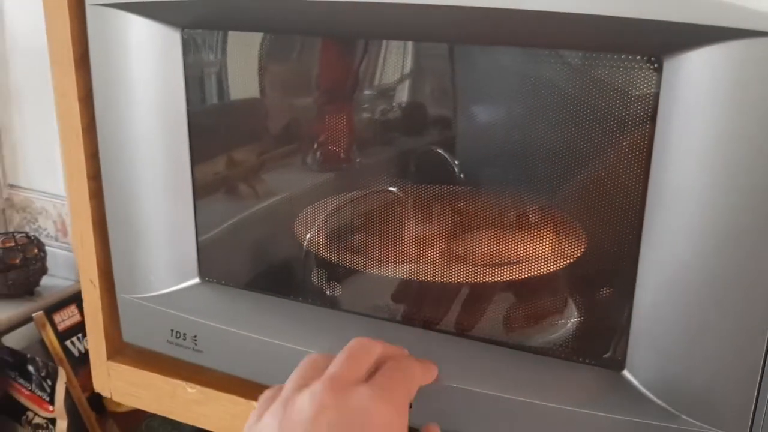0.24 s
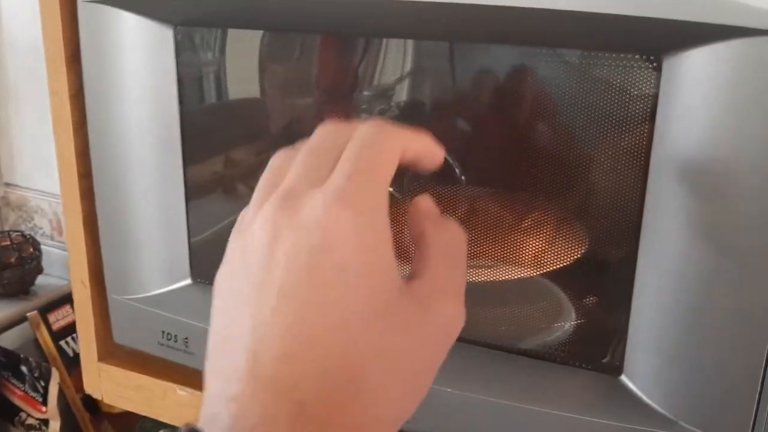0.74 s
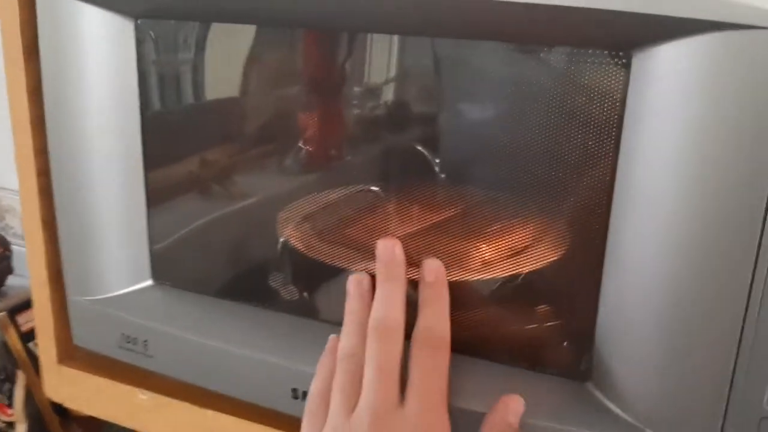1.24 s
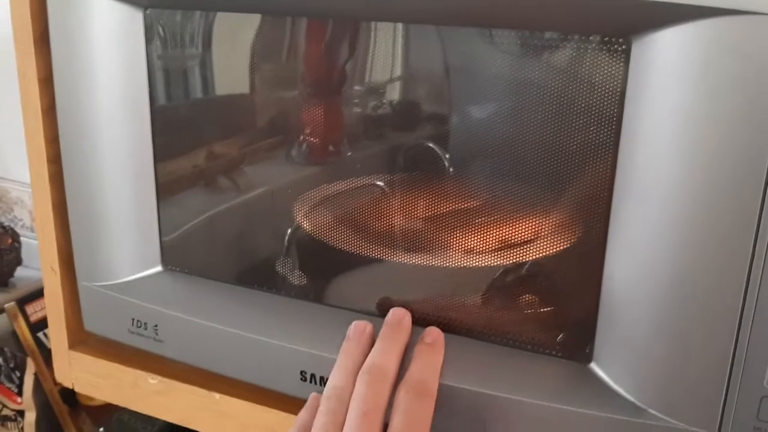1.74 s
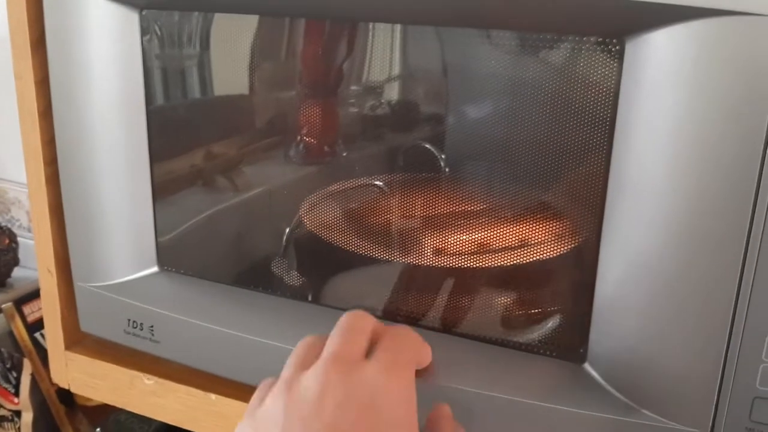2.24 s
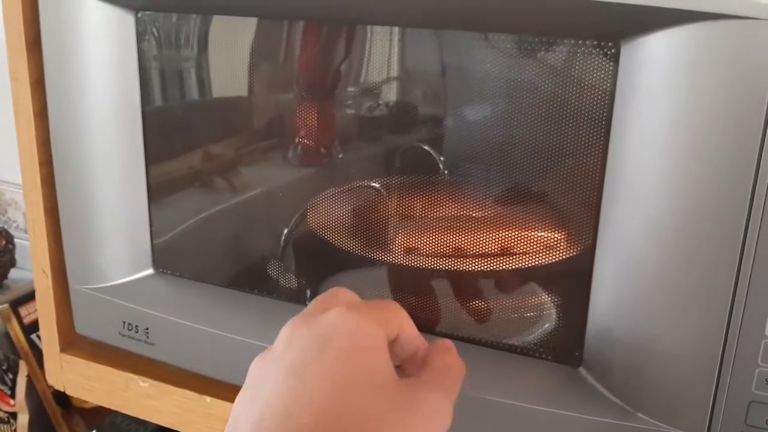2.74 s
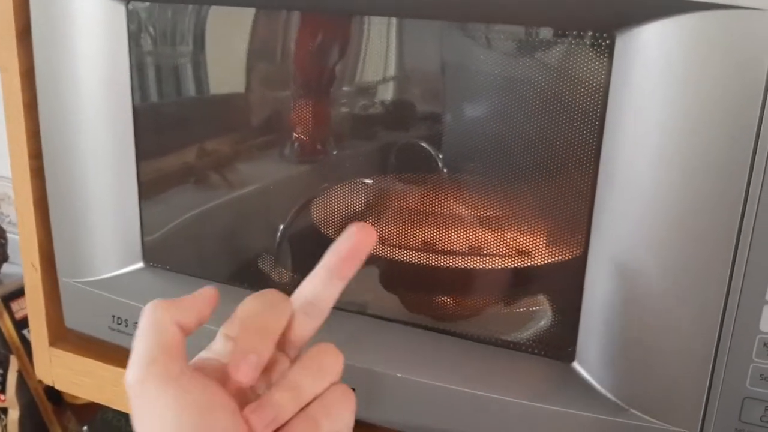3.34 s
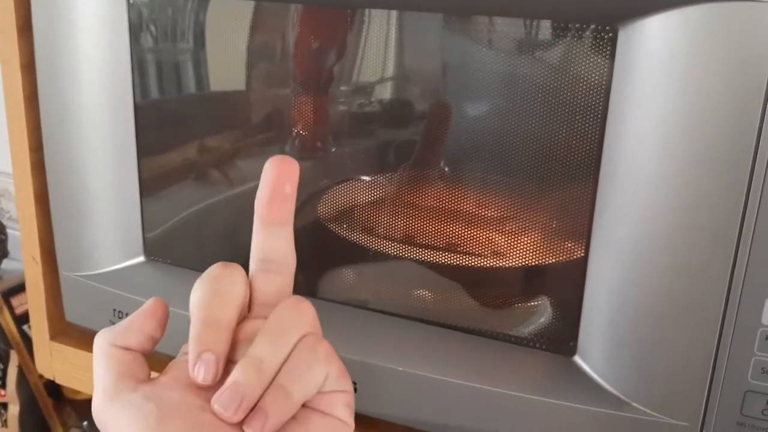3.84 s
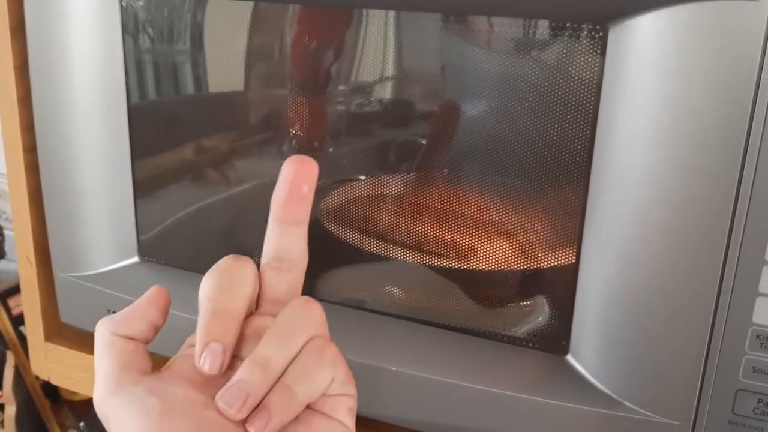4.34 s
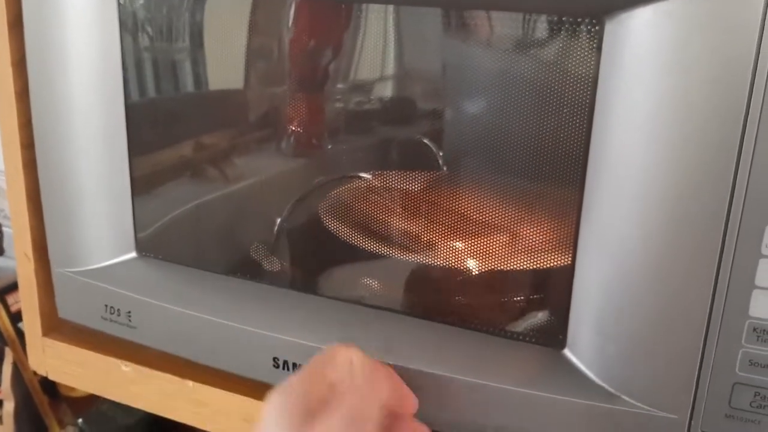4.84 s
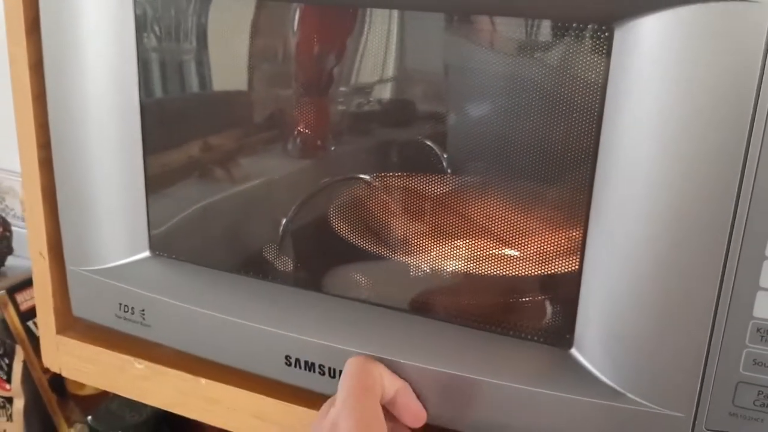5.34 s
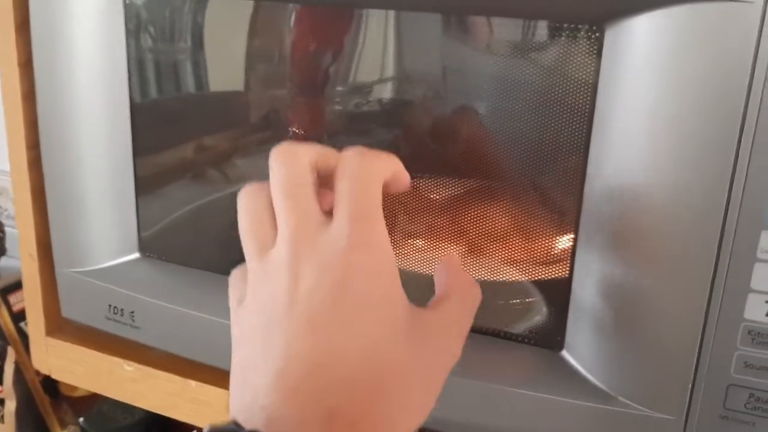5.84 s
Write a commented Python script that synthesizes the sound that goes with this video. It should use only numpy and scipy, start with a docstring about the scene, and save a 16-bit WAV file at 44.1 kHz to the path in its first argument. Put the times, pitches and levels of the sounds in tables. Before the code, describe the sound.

Just in front of a running microwave oven in a kitchen, a low electrical hum with fine buzz, droning fan and soft air rush continue throughout. About one second in, a palm slaps the door: a hollow thud with a brief latch rattle. Fingers then slide faintly over the glass. Later come tiny, very high steam squeals and one small pop from the food. Close stereo microphone, short room ring.

```python
"""The transformer of a running microwave oven hums and buzzes, heard just in front of the door: mains sines.
A hand slaps the door, which rings and rattles in its latch: pushed resonances and short noise bursts.
Fingers slide over the glass as soft hiss; the food squeals thinly as gliding sines and pops once.
Behind this the fan drones as unsteady sines, and cooling air rushes through the case as shaped noise."""
import sys
import numpy as np
from scipy import signal
from scipy.fft import rfft, irfft
from scipy.io import wavfile

SR = 44100
rng = np.random.default_rng(int(sys.argv[2]) if len(sys.argv) > 2 else 0)


def generate_wav(sig):
    """Save sig (samples, or channels by samples) to the path in sys.argv[1] as 16-bit PCM at SR."""
    pcm = np.round(np.clip(np.atleast_2d(sig).T, -1, 1) * 32767).astype(np.int16)
    wavfile.write(sys.argv[1], SR, pcm)


N = 269010
TIME = np.arange(N) / SR   # seconds
BINS = np.maximum(np.fft.rfftfreq(N, 1 / SR), 1)   # Hz, kept above zero for the logarithm

MAINS_HZ, BLADE_HZ = 49.965, 152.64
# strong mains harmonics of the transformer and case (multiples are rounded to whole numbers):
# multiple, level_db, left_minus_right_db, left_lead_rad
HUM_HARMONICS = [(1, -72.5, 8, -1), (2, -54, -6, 0.28), (3, -80, 6, 0.5), (5, -63.5, 0, -1.5),
                 (6, -63.5, 9, -1.3), (8, -56.5, 3, -1.44), (14, -65, -1, -1.5), (16, -67, -6, -0.5),
                 (17, -64.5, 4, -0.3), (18, -62.5, 1, -1.5), (20, -64, -6, 1.3), (22, -64.5, -24, -0.6),
                 (24, -64.5, -19, 4), (26, -67, 15, 1), (30, -64, -0.5, -3), (36, -63, 3, 0.84),
                 (47, -66, -12, -3), (50, -70, -21, -1), (63.96, -65.6, -9, 2), (70.9, -73.5, 0, 1),
                 (73.9, -75.5, 3, 1), (79.2, -74, 0, 1.5), (86.6, -74, -4, 2), (104, -76, 8, 2.2),
                 (116, -79, 5, 1.5), (126, -76, 13, 2.5), (140, -80.5, 3, 0.5), (146, -84, 0, 2.5),
                 (153, -83, 2, 2), (163, -78.5, 4, 1)]
# fine buzz, the usual level of each other mains harmonic: pitch_hz, level_db
BUZZ_LEVELS = [(350, -74), (700, -65), (1250, -68.5), (2250, -86.5), (2750, -103), (3700, -79), (4300, -83),
               (4750, -86), (6000, -102.5), (7500, -79.5), (8250, -102), (8900, -101)]
# the hum starts dull: harmonics above a corner lack some dB per octave, a lack that dies away
DULL_ABOVE_HZ, DULL_DB_PER_OCTAVE, BRIGHTEN_S = 770, 3.5, 1.6
# the door drones on one harmonic, which slowly swells and fades; the hand damps it while it rests there
DRONE_MULTIPLE, DRONE_PEAK_DB, DRONE_PEAK_S, DRONE_SLOPE_DB_PER_S = 4, -48.5, 1.9, 1.74
HAND_ON_S, HAND_OFF_S, HAND_EASE_S, HAND_DAMPS_DB = 1.05, 1.87, 0.06, 7
WHINE_MULTIPLE = 82
# thin whine on that high harmonic, before its trim: time_s, level_db
WHINE_LEVELS = [(0, -72), (0.45, -71.7), (0.85, -62), (2.0, -67), (2.9, -64), (4.4, -70.5), (5.6, -65),
                (6.1, -66)]

# pushes of the palm on the door, which swings in and back: start_s, thud_db, contact_s, smack_db
SLAP_PUSHES = [(.9745, -20, .002, -6), (.9787, -4, .0046, 0), (.9844, -17, .0015, -13),
               (1.0024, -10, .0082, -9)]
# resonances of door and case, before trim and ear differences: pitch_hz, level_db, fall_by_60_db_s
DOOR_MODES = [(86, -25, .35), (142, -4.6, .17), (158, -6.6, .15), (188, -9, .19), (261, 3, .03),
              (323, -8, .28), (377, -14, .11), (455, -9, .13), (604, -12, .15), (644, -4, .08),
              (703, 3.5, .04), (815, -4, .16), (906, -5, .15), (1115, -5, .09), (1394, -12, .08)]
# colour of the palm's smack: pitch_hz, density_db_per_hz
SMACK_COLOUR = [(30, -115), (300, -76), (1000, -59.5), (2200, -68), (3300, -77), (4200, -60.5), (5000, -71),
                (5800, -70), (6500, -69), (7500, -65), (8800, -82), (16000, -81)]
# colour of the latch's clatter: pitch_hz, density_db_per_hz
LATCH_COLOUR = [(30, -115), (300, -65), (1000, -55), (1400, -59.5), (2000, -63.5), (2800, -63.5),
                (3700, -68.5), (5000, -64), (6000, -71.5), (7400, -68), (9000, -80.5), (16000, -78)]
# the door then chatters in its latch, in touches whose clatter grows weaker
RATTLE_START_S, RATTLE_GAP_S, RATTLE_TOUCHES = 1.0103, 0.0042, 4
RATTLE_THUD_DB, RATTLE_CONTACT_S = -25, 0.0013
RATTLE_CLATTER_DB, RATTLE_LOSS_DB = 1, 3   # first touch, loss per touch

# strokes of the fingers over the door: start_s, length_s, level_db
FINGER_STROKES = [(1.07, 0.76, 1), (3.07, 0.22, -3)]
# colour of skin sliding on glass: pitch_hz, density_db_per_hz
SKIN_COLOUR = [(1500, -112), (4000, -104), (7500, -103), (9500, -110), (16000, -112)]

# steam squealing out of the food, one list of points for each squeal: time_s, pitch_hz
SQUEAL_CURVES = [
    [(2.415, 11061), (2.433, 11386), (2.487, 11225), (2.577, 11803), (2.71, 10148)],
    [(4.945, 10551), (4.959, 10804), (5.117, 11458), (5.325, 10739), (5.36, 10427)],
]
# more pressure makes a squeal both higher and louder; the level is that at SQUEAL_HZ
SQUEAL_HZ, SQUEAL_DB, SQUEAL_DB_PER_HZ, SQUEAL_FADE_S = 11260, -73, 0.0042, 0.025
# the two close bursts of the pop in the food: start_s, level_db
POP_BURSTS = [(4.928, 5), (4.9315, 1)]
# colour of the pop: pitch_hz, density_db_per_hz
POP_COLOUR = [(100, -125), (800, -92), (2000, -75), (2700, -82), (3300, -79), (4000, -83), (4800, -80),
              (5800, -80.5), (7500, -80), (9500, -88), (16000, -93)]

# fan blade tones (multiples of the blade rate): multiple, level_db, left_minus_right_db, left_lead_rad
BLADE_TONES = [(1, -47.5, -2, -0.31), (2, -49, 0, -0.019), (3, -60.5, 9, -0.44), (4, -59, -7.5, -0.2),
               (5, -63.5, 7, -1.95), (6, -63, -6, -.9)]
# faint motor tones: pitch_hz, level_db
MOTOR_TONES = [(107.5, -70), (339, -65), (377, -84), (388, -64.5), (509, -71.5)]
# rush of the cooling air: pitch_hz, density_db_per_hz
AIR_COLOUR = [(25, -101), (52, -101), (74, -79.5), (120, -80.5), (160, -76), (450, -77), (900, -80),
              (1020, -84.5), (2000, -90), (4400, -97.5), (4900, -102), (8200, -104), (9200, -115),
              (16000, -116)]
# peaks and dips that the case gives to the air: pitch_hz, width_hz, change_db
CASE_PEAKS = [(160, 38, 3.5), (337, 130, 1), (543, 71, -9.5), (610, 71, 3), (765, 162, 4), (890, 62, 4.5),
              (1260, 100, 2), (2580, 225, 4), (4050, 250, 1), (7400, 1700, -3)]
# stereo width of the air and the room: pitch_hz, side_minus_mid_db
STEREO_WIDTH = [(30, -3), (80, -16), (220, -22), (350, -15), (460, -12), (535, 0), (620, -9.5), (900, -6.5),
                (1200, -2), (2000, 0.5), (5000, -0.5), (16000, 0.5)]
# how long the kitchen rings: pitch_hz, fall_by_60_db_s
KITCHEN_DECAY = [(80, .5), (200, .55), (400, .45), (800, .42), (2500, .3), (8000, .28), (16000, .22)]
CUTOFF_HZ = 15800


def transformer():
    """The core clenches twice a mains cycle; panels radiate a few harmonics strongly over a fine buzz."""
    phase = 2 * np.pi * MAINS_HZ * TIME + .004 * drift(0.38)
    return door_drone(phase) + whine(phase) + hum(phase) + buzz(phase)


def door_drone(phase):
    """The door sings along with one mains harmonic; a resting hand damps its motion."""
    hand_on = np.tanh((TIME - HAND_ON_S) / HAND_EASE_S)
    hand_off = np.tanh((TIME - HAND_OFF_S) / HAND_EASE_S)
    hand = (hand_on - hand_off) / 2   # 1 while it rests on the door
    level_db = DRONE_PEAK_DB - DRONE_SLOPE_DB_PER_S * np.abs(TIME - DRONE_PEAK_S)
    level_db = level_db - HAND_DAMPS_DB * hand + drift(2.1)
    return tone(DRONE_MULTIPLE * phase, level_db, -2.0, -0.43)


def whine(phase, jitter_rad=0.42, trim_db=-4):
    """One high mains harmonic stands out, with an unsteady phase and level."""
    level_db = trim_db + in_time(WHINE_LEVELS)[0] + 1.5 * drift(3.1)
    return tone(WHINE_MULTIPLE * phase + jitter_rad * drift(13), level_db, 6.6, 0.89)


def hum(phase, waver_db=2.5, jitter_rad=0.42):
    """The core shakes the case at whole multiples of the mains pitch."""
    out = np.zeros((2, N))
    for multiple, db, pan_db, lead in HUM_HARMONICS:
        k = round(multiple)
        waver = waver_db * min(k / 16, 1) * drift(1.85)   # short waves change most as the microphone moves
        jitter = jitter_rad * min(k / 80, 1) * drift(9.6)   # the highest harmonics are the least steady
        start = rng.uniform(0, 2 * np.pi)
        out += tone(k * phase + jitter + start, db + dullness_db(k * MAINS_HZ) + waver, pan_db, lead)
    return out


def dullness_db(hz):
    """The change in a harmonic's level while the hum is still brightening."""
    return -DULL_DB_PER_OCTAVE * max(np.log2(hz / DULL_ABOVE_HZ), 0) * np.exp(-TIME / BRIGHTEN_S)


def buzz(phase, scatter_db=4.5, start_boost_db=1.0):
    """Many weak harmonics repeat as one wave each mains cycle, its colour shifting from place to place."""
    strong = [round(row[0]) for row in HUM_HARMONICS] + [WHINE_MULTIPLE]
    orders = np.setdiff1d(np.arange(7, 180), strong)
    cycle = np.linspace(0, 2 * np.pi, 2048)
    place = np.pi * TIME / TIME[-1] + 0.27 * drift(0.77)
    boost = from_db(start_boost_db * np.exp(-TIME / BRIGHTEN_S))   # dies away
    out = np.zeros((2, N))
    for share in (np.cos(place), np.sin(place)):
        for ear in range(2):
            scatter = scatter_db * rng.uniform(-1, 1, len(orders))
            gains = from_db(at_hz(BUZZ_LEVELS, orders * MAINS_HZ) + scatter)
            starts = rng.uniform(0, 2 * np.pi, (len(orders), 1))
            wave = gains @ np.sin(np.outer(orders, cycle) + starts)
            out[ear] += share * boost * np.interp(phase % (2 * np.pi), cycle, wave)
    return out


def door(burst_t60=.03):
    """Soft pushes set the door's modes ringing; the palm smacks first, then the latch clatters."""
    rattle = []
    for k in range(RATTLE_TOUCHES):
        start = RATTLE_START_S + RATTLE_GAP_S * (k + rng.uniform(-0.16, 0.14))
        clatter_db = RATTLE_CLATTER_DB - RATTLE_LOSS_DB * k
        rattle.append((start, RATTLE_THUD_DB, RATTLE_CONTACT_S, clatter_db))
    thud = door_thud(SLAP_PUSHES + rattle)
    smacks = [(s, db) for s, _, _, db in SLAP_PUSHES]
    touches = [(s, db) for s, _, _, db in rattle]
    smack = colour(bursts(smacks, burst_t60), at_hz(SMACK_COLOUR, BINS))
    clatter = colour(bursts(touches, burst_t60), at_hz(LATCH_COLOUR, BINS))
    return kitchen(thud * from_db([[-.5], [.5]]), wet_db=-10.0) + kitchen(smack + clatter, wet_db=-4.0)


def door_thud(pushes, trim_db=-0.2):
    """Each push drives every door mode, a resonance that rings on at its own pitch and dies."""
    force = np.zeros(N)
    for s, db, contact, _ in pushes:
        push = np.sin(np.pi * np.clip((TIME - s) / contact, 0, 1)) ** 2
        force -= from_db(db) * push / push.sum()   # the door moves away from the listener
    thud = np.zeros((2, N))
    for hz, db, t60 in DOOR_MODES:
        r, w = from_db(-60 / (t60 * SR)), 2 * np.pi * hz / SR
        # the tiny offset keeps the filter's numbers from becoming too small
        velocity = signal.lfilter([.5, 0, -.5], [1, -2 * r * np.cos(w), r * r], force + 1e-18)
        ear_db = rng.normal(0, 3.6, (2, 1)) * hz / 1000   # higher modes reach the ears unequally
        thud += velocity * from_db(trim_db + db + ear_db)
    # a small panel radiates little deep bass, and almost none at the very bottom
    for bass_cut_hz in (70, 85):
        thud = signal.sosfilt(signal.butter(2, bass_cut_hz, "high", fs=SR, output="sos"), thud)
    return thud


def fingers():
    """Skin slides over the glass with a faint hiss; each stroke speeds up and slows down again."""
    speed = 0
    for s, length, db in FINGER_STROKES:
        speed = speed + from_db(db) * np.sin(np.pi * np.clip((TIME - s) / length, 0, 1))
    hiss = colour(rng.standard_normal((2, N)), at_hz(SKIN_COLOUR, BINS))
    return hiss * speed * from_db(1.2 * drift(25))


def food(quiver=0.0022, pop_t60=0.032):
    """Steam squeals through a tiny opening, its pitch and level following the pressure; a blister pops."""
    squeal = 0
    for rows in SQUEAL_CURVES:
        hz, = in_time(rows)
        phase = 2 * np.pi * np.cumsum(hz * (1 + quiver * drift(55))) / SR
        inside = np.minimum(TIME - rows[0][0], rows[-1][0] - TIME)   # seconds from the nearer end
        opening = np.clip(inside / SQUEAL_FADE_S + .5, 0, 1)
        level_db = SQUEAL_DB + SQUEAL_DB_PER_HZ * (hz - SQUEAL_HZ) + 1.5 * drift(25)
        squeal = squeal + opening * tone(phase, level_db, 0, 1)
    pop = colour(bursts(POP_BURSTS, pop_t60), at_hz(POP_COLOUR, BINS))
    return kitchen(squeal, wet_db=-9) + kitchen(pop, wet_db=-5)


def fan(waver_db=1.85, wobble_rad=0.085):
    """Blades chop the air on a slightly unsteady shaft, with faint motor tones."""
    phase = 2 * np.pi * BLADE_HZ * TIME + wobble_rad * drift(1.5)
    out = np.zeros((2, N))
    for k, db, pan_db, lead in BLADE_TONES:
        waver = waver_db * np.sqrt(k / 2) * drift(4.2)
        out += tone(round(k) * phase + rng.uniform(0, 2 * np.pi), db + waver, pan_db, lead)
    for hz, db in MOTOR_TONES:
        motor_phase = 2 * np.pi * hz * TIME + 0.32 * drift(0.86)
        out += tone(motor_phase, db + waver_db * drift(2.8), 0, rng.normal(0, 0.34))
    return out


def air(flutter_db=0.94):
    """Turbulence through the vents, shaped by the case; near surfaces mirror it differently to each ear."""
    mid, diffuse = rng.standard_normal((2, N))
    echoes = rng.standard_normal(SR // 200)   # 5 ms of reflections
    mirror = signal.fftconvolve(mid, echoes / np.linalg.norm(echoes))[:N]
    share = .3 * np.minimum(BINS / 1500, 1)   # mirrored part of the side's power
    side = irfft(np.sqrt(share) * rfft(mirror) + np.sqrt(1 - share) * rfft(diffuse), N)
    density = at_hz(AIR_COLOUR, BINS)
    for hz, width, db in CASE_PEAKS:
        density = density + db * np.exp(-2 * ((BINS - hz) / width) ** 2)
    out = colour(mid, density) + colour(side, density + at_hz(STEREO_WIDTH, BINS)) * [[1], [-1]]
    return out * from_db(flutter_db * drift(2.34)) * from_db([[-.4], [.4]])


def kitchen(x, wet_db, delay=0.005):
    """Add the room: bands of dying reflections, alike at both ears in the bass."""
    t, response = TIME[:SR], 0
    edges = np.geomspace(45, 17000, 10)   # Hz
    for low, high in zip(edges, edges[1:]):
        hz = np.sqrt(low * high)
        band_filter = signal.butter(2, [low, high], "band", fs=SR, output="sos")
        mid, side = signal.sosfilt(band_filter, rng.standard_normal((2, SR)))
        width, t60 = from_db(at_hz(STEREO_WIDTH, hz)), at_hz(KITCHEN_DECAY, hz)
        fade = from_db(-60 * t / t60) * np.clip(t / delay - 1, 0, 1)   # silent first, then in, then dying
        band = (mid + width * side * [[1], [-1]]) * fade
        energy = np.mean(np.sum(band ** 2, axis=1))
        response = response + band * np.sqrt(2 * (high - low) / SR / energy)
    return x + from_db(wet_db) * signal.fftconvolve(x, response, axes=1)[:, :N]


def bursts(hits, t60, rise=0.00053):
    """Each hit (start_s, level_db) frees a stereo burst of noise that swells at once and dies quickly."""
    power = 0
    for s, db in hits:
        age = np.clip(TIME - s, 0, 1)
        power = power + (from_db(db - 60 * age / t60) * (1 - np.exp(-age / rise))) ** 2
    return np.sqrt(power) * rng.standard_normal((2, N))


def tone(phase, db, pan_db, lead):
    """A sine as it arrives at the two ears of the microphone: left and right differ in level and phase."""
    side = np.array([[.5], [-.5]])
    balance = from_db(pan_db * side)
    even_power = np.sqrt(2 / np.mean(balance ** 2))   # panning leaves the mean power alone
    return even_power * balance * from_db(db) * np.sin(phase + lead * side)


def colour(x, db_per_hz):
    """Give unit white noise a power density."""
    return irfft(rfft(x) * from_db(db_per_hz) * np.sqrt(SR / 2), N)


def drift(rate):
    """Smooth chance of spread 1 that changes about rate times a second."""
    step = 100   # samples between the points of the slow curve
    count = N // step + 2
    r = np.exp(-2 * np.pi * rate * step / SR)
    slow = signal.lfilter([1], [1, -2 * r, r * r], rng.standard_normal(2 * count))[count:]
    return np.interp(np.arange(N) / step, np.arange(len(slow)), (slow - slow.mean()) / slow.std())


def from_db(db):
    """Decibels to gain."""
    return 10 ** (np.asarray(db) / 20)


def at_hz(points, hz):
    """Read a table on a log-frequency axis."""
    f, value = np.transpose(points)
    return np.interp(np.log(hz), np.log(f), value)


def in_time(rows):
    """The columns of a curve at every sample."""
    s, *columns = np.transpose(rows)
    return [np.interp(TIME, s, c) for c in columns]


def scene():
    """The running oven and the hand at its door."""
    return transformer() + door() + fingers() + food() + fan() + air()


def record(dry):
    """A steep filter removes the top of the treble."""
    return signal.sosfilt(signal.ellip(12, .1, 80, CUTOFF_HZ, fs=SR, output="sos"), dry)


dry = scene()
out = record(dry)
generate_wav(out)
```